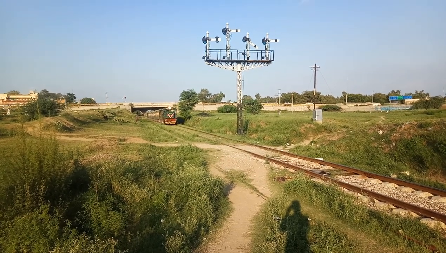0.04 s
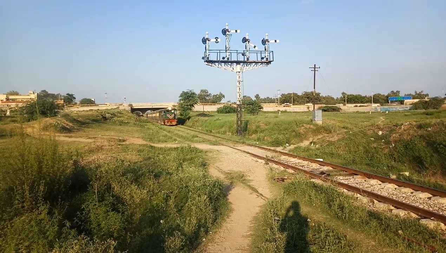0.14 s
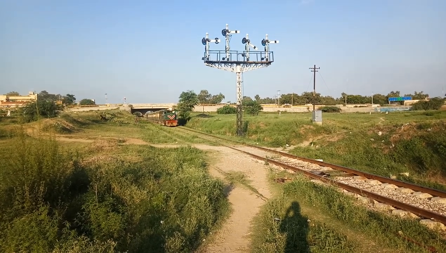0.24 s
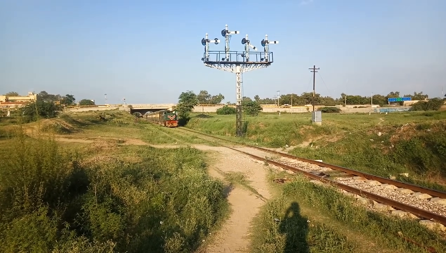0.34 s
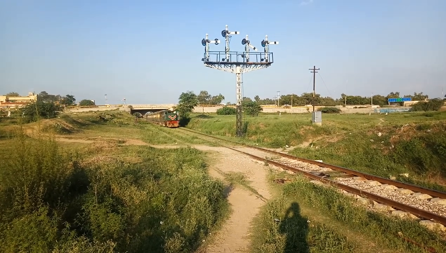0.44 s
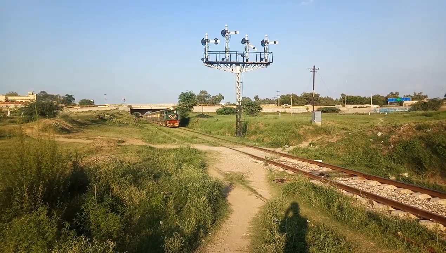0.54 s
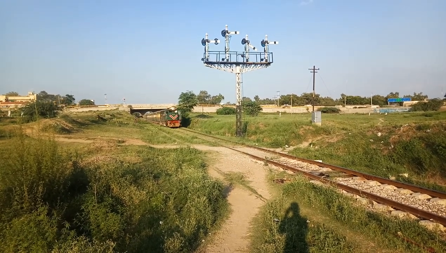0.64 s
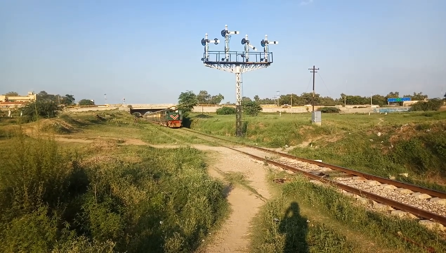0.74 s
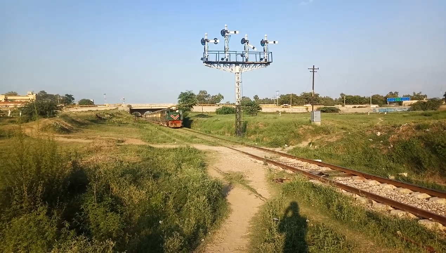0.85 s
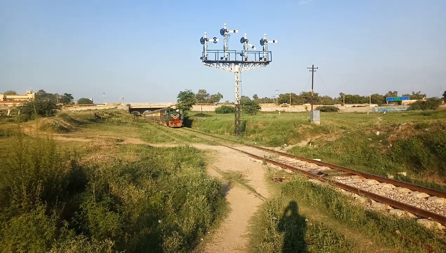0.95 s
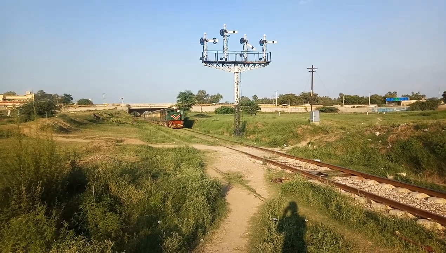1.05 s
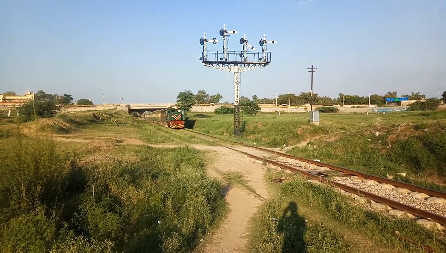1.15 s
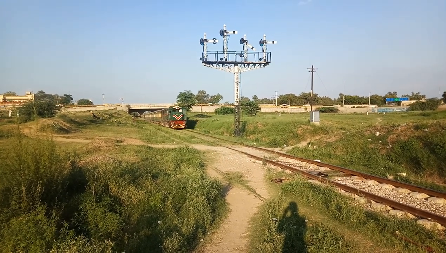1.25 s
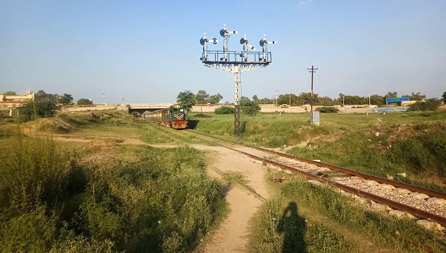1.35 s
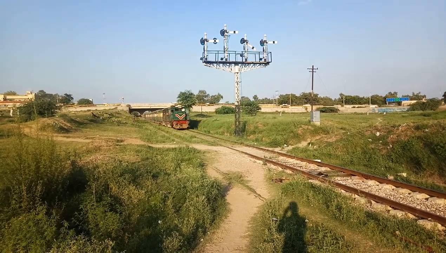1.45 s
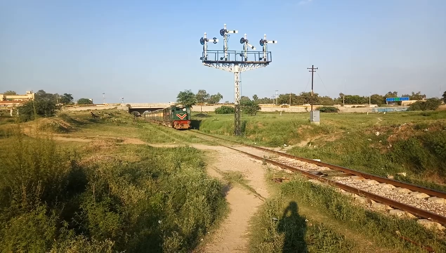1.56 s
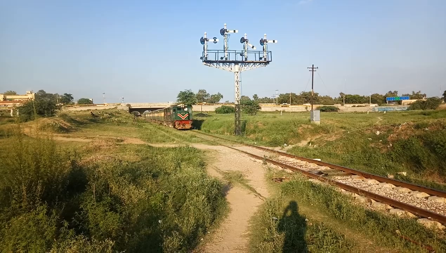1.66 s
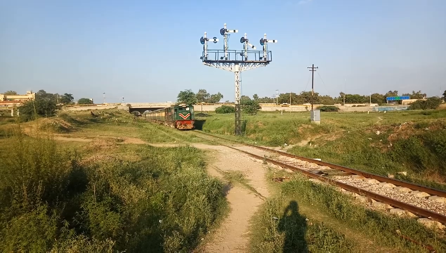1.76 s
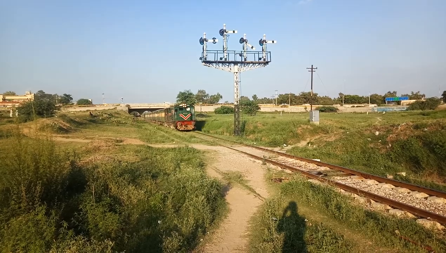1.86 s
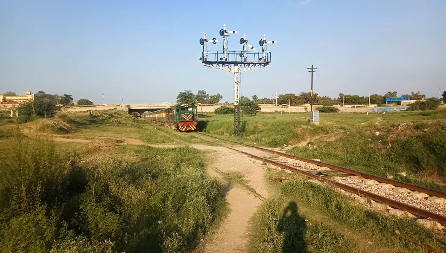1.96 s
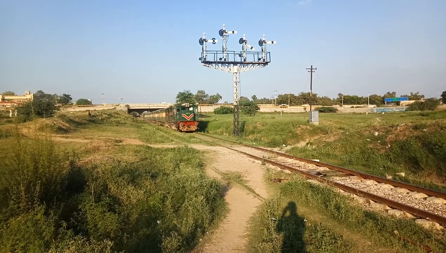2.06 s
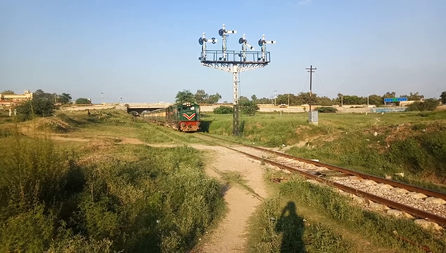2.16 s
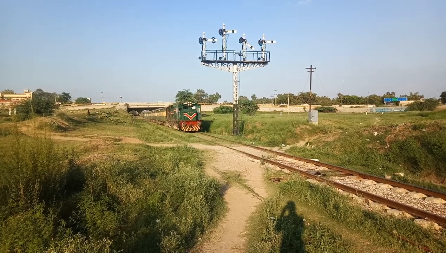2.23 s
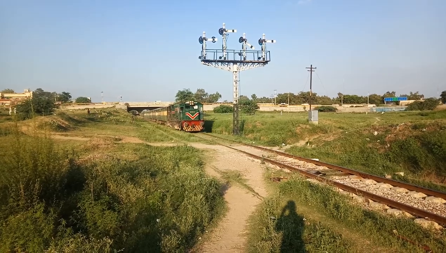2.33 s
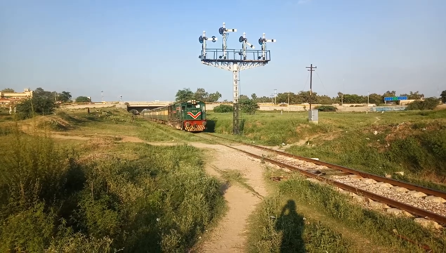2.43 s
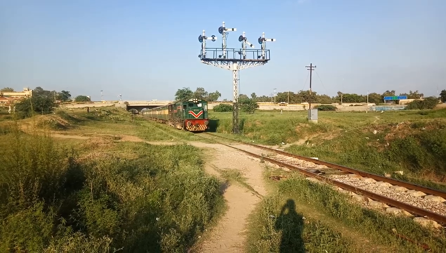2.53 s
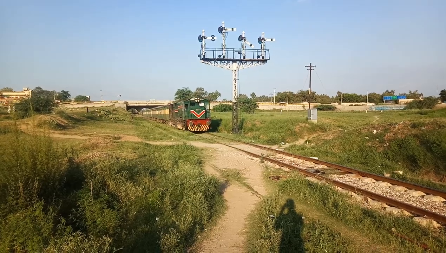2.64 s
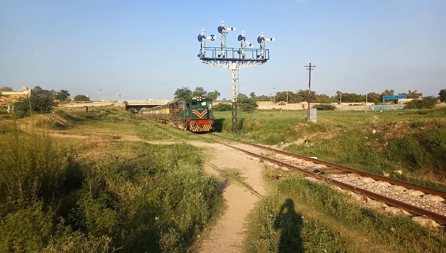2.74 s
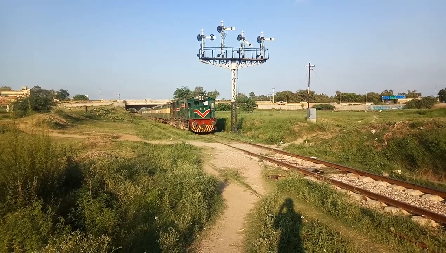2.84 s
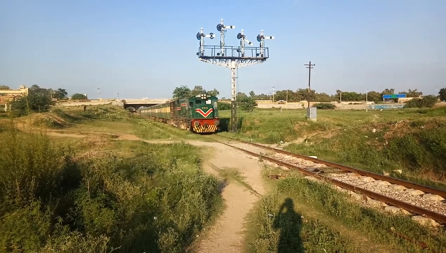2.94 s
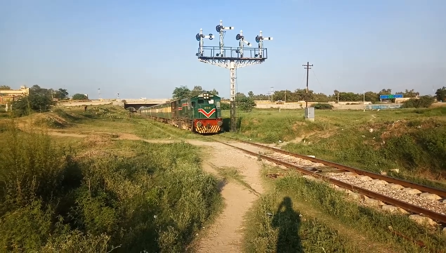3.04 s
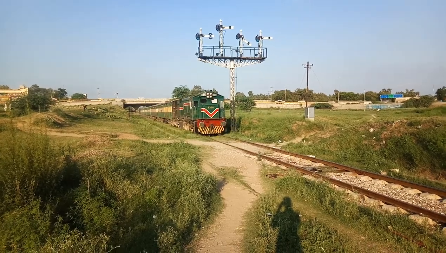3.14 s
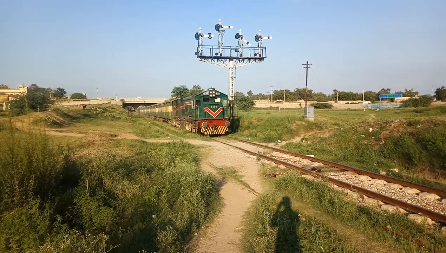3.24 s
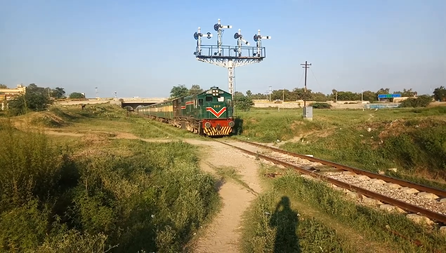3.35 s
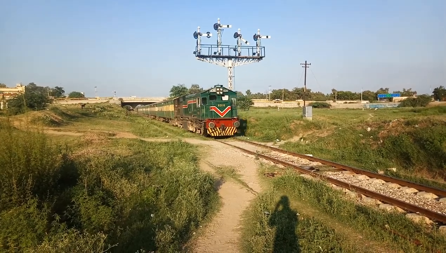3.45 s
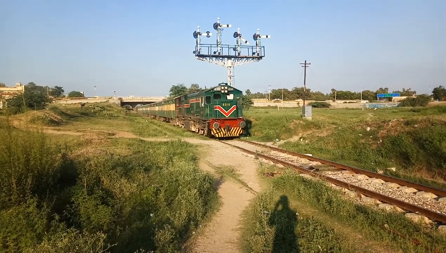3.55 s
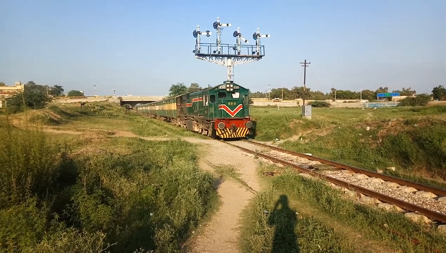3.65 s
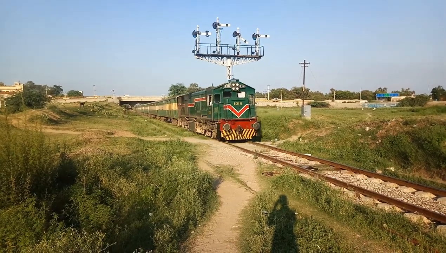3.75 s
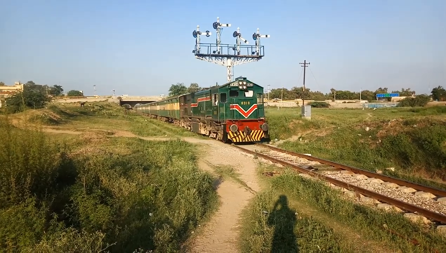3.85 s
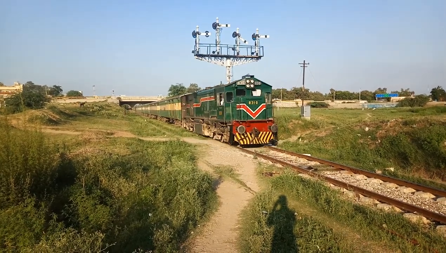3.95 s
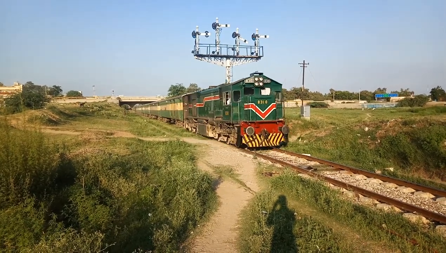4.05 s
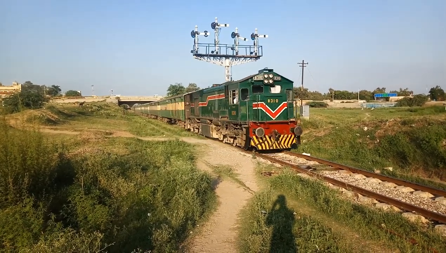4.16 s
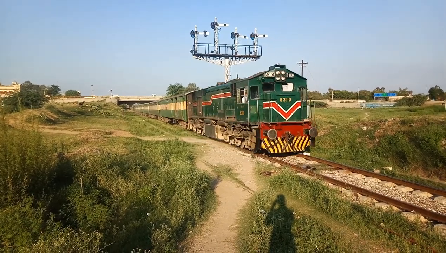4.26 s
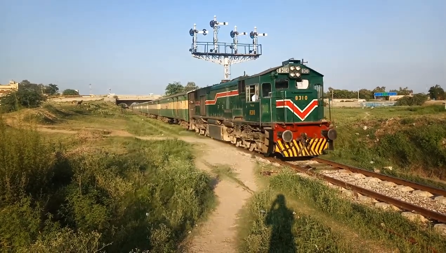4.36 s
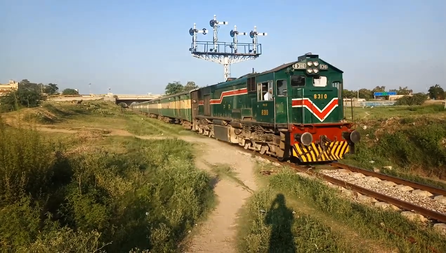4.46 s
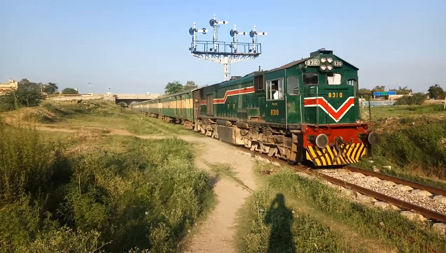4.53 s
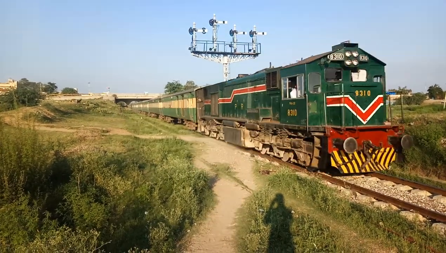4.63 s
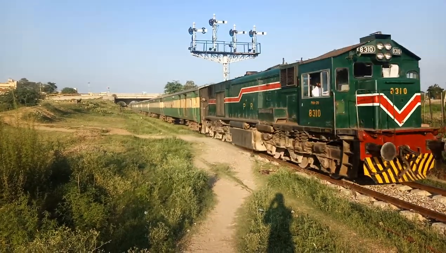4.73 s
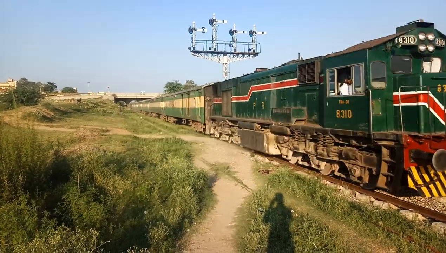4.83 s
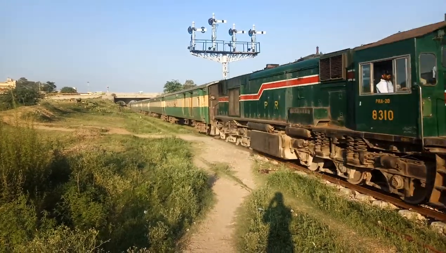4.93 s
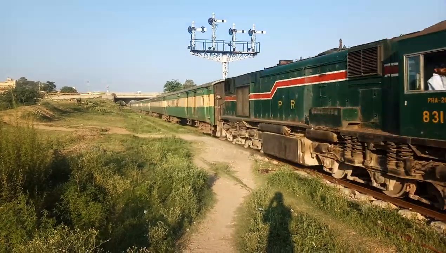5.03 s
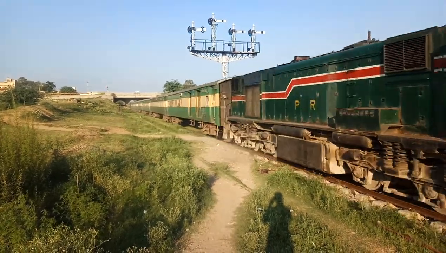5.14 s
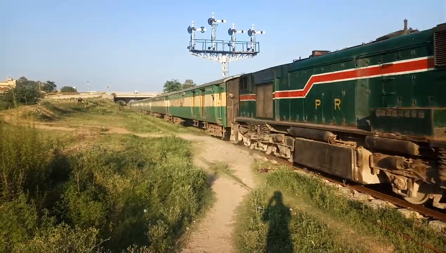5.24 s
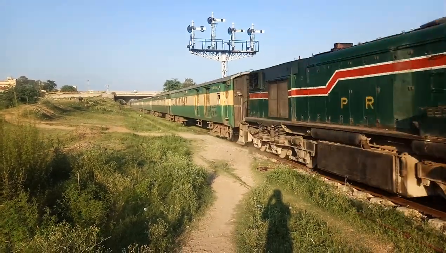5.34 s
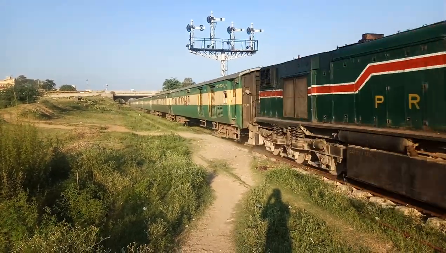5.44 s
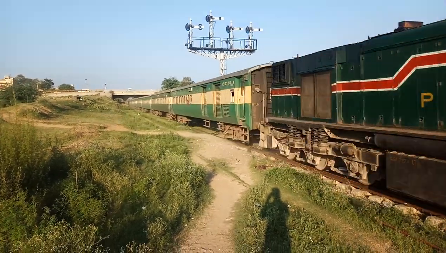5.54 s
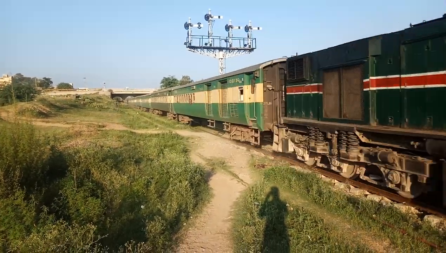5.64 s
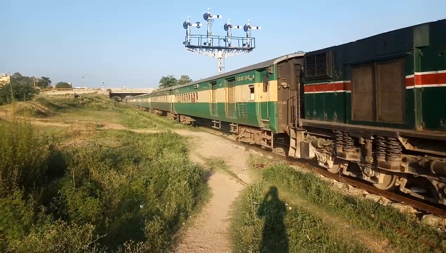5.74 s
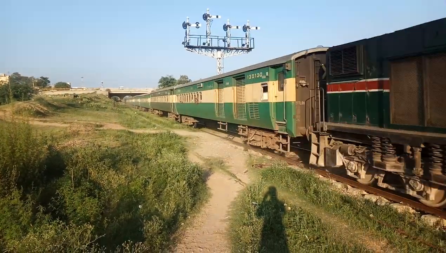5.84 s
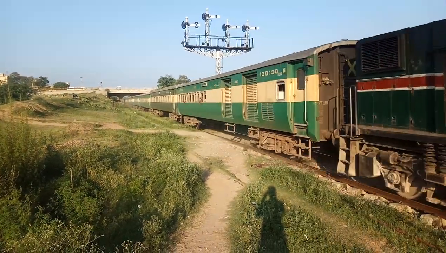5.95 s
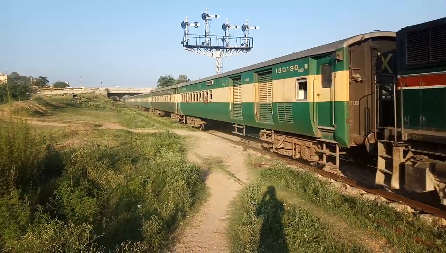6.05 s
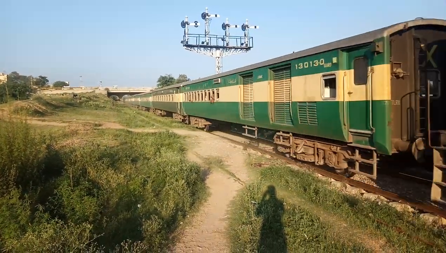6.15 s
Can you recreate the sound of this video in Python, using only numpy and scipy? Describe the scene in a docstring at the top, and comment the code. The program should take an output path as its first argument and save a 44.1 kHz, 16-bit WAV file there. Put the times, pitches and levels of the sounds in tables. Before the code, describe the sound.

Open field, dry and without echo, fixed microphone a few metres from a single track. From 0 s a distant diesel throbs softly, a low, slightly unsteady drone around a hundred pulses a second, over faint hiss and thin ringing in the rails. A tiny squeak opens it; dry ticks fall near 0.6 and 1.3 s. Weak joint clanks come at 0.25, 1.1, 2.0 and 2.8 s. The throb and singing rails grow steadily, with firmer knocks at 3.7 and 3.9 s. From 4.3 s axles hit the joint about every 0.14 s: sharp crack, bright clank, short thud. The cab draws level at 5 s, engine and rails at their fullest. Thuds become heavier and closer together until 5.7 s as bogie roar, rattling gear, tread hiss and ringing wheel discs take over. A last double blow lands just after 6 s, still loud at the 6.2 s cut.

```python
"""A diesel passenger train comes up a single track in open fields and passes a few metres away.
Noise puffs and wavering tones make the exhaust throb and drone; filtered noise sings in the rails.
Axle after axle strikes a rail joint: noise bursts crack, clank and thud.
As the locomotive draws level, the broad noise roar of its bogies takes over, with ringing wheel discs.
Ground rumble, faint hiss, thin squeaks and two dry ticks fill in the rest."""
import sys
import numpy as np
from scipy import signal
from scipy.fft import rfft, irfft, next_fast_len
from scipy.io import wavfile
from scipy.ndimage import uniform_filter1d, minimum_filter1d, map_coordinates

SR = 44100
rng = np.random.default_rng(int(sys.argv[2]) if len(sys.argv) > 2 else 0)


def generate_wav(signal):
    """Clip the signal to [-1, 1] and save it as 16-bit WAV at the path in sys.argv[1]."""
    frames = np.transpose(np.atleast_2d(signal))
    scaled = np.clip(frames, -1, 1) * 32767
    pcm = np.round(scaled).astype(np.int16)
    wavfile.write(sys.argv[1], SR, pcm)


N = 272979

# Engine speed as heard. Each row: time in seconds, firings per second.
FIRING_RATE = [(0, 105), (3.5, 103.8), (4.5, 105.6), (5.4, 104), (6.19, 108.5)]
# Strong engine lines. Each row: multiple of the firing rate, relative level in dB, width in Hz.
ENGINE_LINES = [(3, -2.7, 10), (34 / 12, -5.5, 13), (2, -9.5, 10), (22 / 12, -16.5, 8.8),
                (13 / 12, -15.5, 6.5)]
# Swell of the drone. Each row: time in seconds, relative level in dB.
DRONE_SWELL = [(0.0, -47), (0.5, -43.0), (0.8, -43.5), (0.97, -47), (1.3, -40), (1.9, -37), (2.75, -37),
               (3.12, -28.5), (3.45, -30.7), (3.93, -18.5), (4.4, -19.5), (4.82, -25), (5.0, -20.3),
               (5.3, -26.7), (5.5, -16.5), (5.8, -24.5), (6.19, -18)]
# Exhaust close by. Each row: frequency in Hz, relative power density in dB.
EXHAUST_NEAR_SPECTRUM = [(15, -34.5), (35, -29), (50, -27.5), (72, -9), (98, -8), (120, -2.5), (165, -3),
                         (205, 1.5), (255, -1.5), (320, -2.5), (400, -5.5), (470, -15.5), (900, -63),
                         (3000, -110)]
# Exhaust from afar, the ground cancelling its middle. Each row: frequency in Hz, relative density in dB.
EXHAUST_FAR_SPECTRUM = [(15, -27.5), (40, -24.5), (75, -1.5), (105, -5.5), (150, 2.5), (210, -2.5),
                        (260, -0.5), (320, -3), (345, -9), (400, -9), (470, -22), (900, -61), (3000, -110)]
# Engine clatter. Each row: frequency in Hz, relative power density in dB.
CLATTER_SPECTRUM = [(250, -32), (480, -9.5), (630, 6), (740, 5), (920, 2.5), (1030, -20.5), (1180, -12.5),
                    (1500, -25.5), (2500, -25.5), (8000, -100)]
# Rail sound beneath its resonances. Each row: frequency in Hz, relative power density in dB.
RAIL_SPECTRUM = [(300, -52.5), (600, -6.5), (1400, -7), (1650, -11.5), (2300, -19.5), (2650, -3.5),
                 (3800, -1), (4300, -8.5), (5000, -22), (6000, -31), (6900, -35.5), (7600, -48.5),
                 (10000, -52.5), (15500, -74)]
# Rail resonances. Each row: frequency in Hz, width in Hz, relative level in dB.
RAIL_RESONANCES = [(1177, 116, -2.5), (1896, 204, -3), (2600, 256, -1.5), (3480, 500, -2), (3520, 130, -11)]
# Pitch of the ringing rails. Each row: time in seconds, frequency ratio.
RAIL_PITCH_RATIO = [(0, 1.038), (2.3, 1.039), (3.4, 1.016), (4.6, .98), (6.19, .96)]
# Band that travels farthest along the rail. Each row: frequency in Hz, width in Hz, relative level in dB.
CARRIED_BAND = [(3540, 500, -0.5)]
# Bogies going by. Each row: time when level in seconds, relative level in dB.
BOGIES_LEVEL = [(5.54, 0), (6.17, 1.7)]
# Brake gear and bogie frames. Each row: frequency in Hz, relative power density in dB.
RATTLE_SPECTRUM = [(300, -24), (700, 2.5), (1200, 2), (1600, 2), (2000, 1), (2500, -0.5), (3700, -16.5),
                   (4800, -17.5), (7000, -35.5), (9000, -42), (15500, -52)]
# Bogie roar. Each row: frequency in Hz, relative power density in dB.
ROAR_SPECTRUM = [(60, -37.5), (150, -9.5), (280, 1), (400, 2), (550, 0.5), (750, -14.5), (1200, -13),
                 (3000, -56), (8000, -100)]
# Tread hiss. Each row: frequency in Hz, relative power density in dB.
HISS_SPECTRUM = [(3000, -15), (4900, -20), (5500, -26), (5950, 11.5), (6700, 0.5), (7600, -11), (9000, -16),
                 (9900, -25), (12000, -20), (15500, -20.5)]
# Ringing wheel discs. Each row: frequency in Hz, relative level in dB, width in Hz.
DISC_MODES = [(2630, 14, 89), (5270, 2.5, 110), (6130, -3, 320), (9030, -25, 110), (10300, -29, 90),
              (11300, -28, 90), (13300, -31, 90), (14300, -32.5, 120)]
# Ground rumble. Each row: frequency in Hz, relative power density in dB.
RUMBLE_SPECTRUM = [(15, -30), (35, -26), (52, -1), (75, 11.5), (130, 15.5), (180, -9.5), (350, -48),
                   (1500, -110)]
# Thin squeaks. Each row: start in seconds, frequency in Hz, level in dB, length in seconds.
SQUEAK_EVENTS = [(0.015, 2060, -48.5, 0.05), (5.178, 9030, -49, .035), (5.753, 13300, -59, 0.068)]
# Wheels on rail joints. Each row: time in seconds, relative clank dB, relative thud dB, thud in Hz.
JOINT_BLOWS = [(0.2496, -26.5, -39, 690), (1.1029, -27, -28.5, 1280), (1.9729, -17, -31, 1220),
               (2.8476, -18, -39, 450), (3.7494, -13, -9, 700), (3.8918, -15, -8.5, 810),
               (4.291, -2.5, -9.5, 650), (4.4292, -4, -6.5, 700), (4.582, -3, -10.5, 670),
               (4.7062, -2.5, -11, 850), (4.8489, 0.5, -18, 750), (5.002, -2.5, -12, 645),
               (5.1377, -6, -22, 750), (5.2621, -5, -18, 830), (5.3219, -10, -3, 500),
               (5.4042, -9, -8.5, 780), (5.4654, -6.5, -7.5, 590), (5.6201, -7, -4, 450),
               (5.7025, -10.5, -14, 660), (6.029, -6, -2, 533), (6.0659, -6.5, -7, 690)]
# First sharp contact of steel on steel. Each row: frequency in Hz, relative power density in dB.
CRACK_SPECTRUM = [(600, -8), (2000, 5), (4000, 0), (5000, -4.5), (6500, -9.5), (8000, -25.5),
                  (10000, -37.5), (15500, -42)]
# Rail clank. Each row: frequency in Hz, relative power density in dB.
CLANK_SPECTRUM = [(300, -17), (900, -2), (2200, -12.5), (2750, 0.5), (3800, 0.5), (4400, -7), (5300, -20),
                  (6200, -21.5), (7600, -42), (10000, -51), (15500, -47.5)]
# Sleeper and bogie thud. Each row: frequency in Hz, relative power density in dB.
THUD_SPECTRUM = [(50, -20), (150, -2.5), (330, 4.5), (520, -2.5), (850, -5.5), (1400, -8.5), (3000, -26.5),
                 (10000, -91)]
# Dry ticks. Each row: start in seconds, level in dB.
TICK_EVENTS = [(.642, -44), (1.280, -44)]

# Train speed, distance of the track, moment the cab draws level.
SPEED_M_PER_S, TRACK_M, LEVEL_S = 14.6, 4.78, 5.023
# Approach: full level, distance where reached, spreading dB per tenfold distance,
# ground that halves the amplitude, fade in dB per second behind the cab.
EXHAUST_PASS = dict(full_db=-18, reach_m=11.2, spread_db=6.5, halving_m=27.6, fade_db=4.5)
CLATTER_PASS = dict(full_db=-24, reach_m=15.4, spread_db=27, halving_m=56, fade_db=4.5)
RAIL_PASS = dict(full_db=-19.5, reach_m=10, spread_db=18.5, halving_m=58, fade_db=5)
CARRIED_PASS = dict(full_db=-38, reach_m=12, spread_db=2, halving_m=24.3, fade_db=4)
WHEEL_PASS = dict(full_db=-44.5, reach_m=5.7, spread_db=16, halving_m=3.9, fade_db=6)
RUMBLE_PASS = dict(full_db=-35.5, reach_m=15, spread_db=6, halving_m=300, fade_db=1)
AIR_PASS = dict(full_db=-72.5, reach_m=15, spread_db=1.5, halving_m=125, fade_db=1)

FAR_COLOUR_M = 33.7  # metres still to run beyond which the exhaust is all far colour
GRASS_HALVING_M = 17  # grass muffles the low-slung running gear
CRACK_DB, CRACK_HALVING_M = -18, 13  # crack relative to the whole blow; ground swallows it
DULL_HZ, DULL_HALVING_M = 14000, 15  # a distant clank loses its top: this stretch halves this frequency
CRACK_T60_S, CLANK_T60_S, THUD_T60_S = .066, .11, .16
TOP_HZ = 15600


def amp(db):
    """Decibels to amplitude gain."""
    return 10 ** (np.asarray(db) / 20)


def unit(x):
    """Scale to rms 1."""
    return x / np.sqrt(np.mean(x ** 2) + 1e-20)


def seconds(count=N):
    """Time of each sample."""
    return np.arange(count) / SR


def curve(rows):
    """Interpolate (time, value) rows to one value per sample."""
    s, values = np.transpose(rows)
    return np.interp(seconds(), s, values)


def wobble(rate):
    """Smooth random curve of rms 1, rate knots per second."""
    knots = rng.standard_normal(4096)
    coarse = np.arange(0, N + 32, 32)
    values = map_coordinates(knots, [coarse * rate / SR], mode="mirror")
    return unit(np.interp(np.arange(N), coarse, values))


def wavering(width_hz):
    """Complex gain drifting in strength and phase, widening a tone into a narrow band."""
    return (wobble(2 * width_hz) + 1j * wobble(2 * width_hz)) / np.sqrt(2)


def colour(x, spectrum, modes=()):
    """Minimum-phase filter with a given spectrum plus resonances; rms 1 out."""
    size = 2 * next_fast_len(len(x) // 2 + 1024)
    hz = np.fft.rfftfreq(size, 1 / SR)
    f, db = np.transpose(spectrum)
    power = amp(np.interp(np.log(hz + 1), np.log(f), db)) ** 2
    for centre, width, level in modes:
        power = power + amp(level) ** 2 / (1 + ((hz - centre) / width) ** 2) ** 3
    # fold the cepstrum onto positive time to make the filter causal
    cepstrum = irfft(np.log(power + 1e-14) / 2)
    cepstrum[1:size // 2] *= 2
    cepstrum[size // 2 + 1:] = 0
    response = np.exp(rfft(cepstrum))
    return unit(irfft(rfft(x, size) * response, size)[:len(x)])


def noise(count=N):
    """White noise of rms 1."""
    return rng.standard_normal(count)


def add(track, s, sound):
    """Mix a sound into the track at time s."""
    room = track[max(round(s * SR), 0):][:len(sound)]
    room += sound[:len(room)]


def ahead(reach_m):
    """Metres the train has still to run until within reach_m of level."""
    return np.maximum(SPEED_M_PER_S * (LEVEL_S - seconds()) - reach_m, 0)


def halved(gap_m, halving_m):
    """Loss in dB when every halving_m metres halve the amplitude."""
    return 20 * np.log10(2) * gap_m / halving_m


def passing(full_db, reach_m, spread_db, halving_m, fade_db):
    """Level in dB: grows by spreading and ground loss, holds, fades once the cab is past."""
    gap = ahead(reach_m)
    past_s = np.maximum(seconds() - LEVEL_S, 0)
    spreading = spread_db * np.log10(np.hypot(1, gap / TRACK_M))
    return full_db - spreading - halved(gap, halving_m) - fade_db * past_s


def puffs(firings, uneven_db, scatter_db, fade, count=12):
    """One decaying gas puff per firing; each cylinder has its own strength."""
    index = firings.astype(int)
    cylinders = uneven_db * unit(noise(count))
    strength = amp(cylinders[index % count] + scatter_db * noise(2048)[index])
    return unit(strength * np.exp(-fade * (firings % 1)))


def exhaust(firings):
    """Turbulent gas puffs whose colour turns from far to near."""
    gas = puffs(firings, uneven_db=1.5, scatter_db=0.9, fade=0.74)
    turn = np.pi / 2 * np.clip(1 - ahead(reach_m=12.7) / FAR_COLOUR_M, 0, 1)
    far = np.cos(turn) * colour(gas * noise(), EXHAUST_FAR_SPECTRUM)
    near = np.sin(turn) * colour(gas * noise(), EXHAUST_NEAR_SPECTRUM)
    flutter_db = 0.91 * wobble(12) + 0.8 * wobble(5.015)
    return amp(passing(**EXHAUST_PASS) + flutter_db) * (far + near)


def drone(firings):
    """Strongest engine orders, wandering on their way through hot, moving air."""
    lines = np.zeros(N)
    for order, db, width_hz in ENGINE_LINES:
        wander = 0.96 + 0.69 * wavering(width_hz)
        lines += amp(db) * np.real(wander * np.exp(2j * np.pi * order * firings))
    return amp(curve(DRONE_SWELL) + 1.76) * lines


def clatter(firings):
    """Mechanical knocks: noise pulsing in step with the firing."""
    knocks = puffs(firings, uneven_db=1.25, scatter_db=1.06, fade=.6)
    return amp(passing(**CLATTER_PASS)) * colour(knocks * noise(), CLATTER_SPECTRUM)


def engine():
    """Exhaust, drone and clatter share one slightly unsteady firing count."""
    firings = np.cumsum(curve(FIRING_RATE) * (1 + .003 * wobble(6))) / SR
    return exhaust(firings) + drone(firings) + clatter(firings)


def rolling(grit_db, grit_rate, judder_db, judder_rate):
    """Contact force of rough steel: noise in quick grains and slower judders."""
    return noise() * amp(grit_db * wobble(grit_rate) + judder_db * wobble(judder_rate))


def chatter(rate, t60_s, share):
    """Gain of loose parts knocking at random, rate per second; share is the knocks' part of the power."""
    struck = rng.random(N) < rate / SR
    size = rng.exponential(size=N)
    decay = amp(-60 * seconds(SR // 10) / t60_s) ** 2
    power = np.abs(signal.fftconvolve(struck * size, decay)[:N])
    return np.sqrt(1 - share + share * power / power.mean())


def patchy(x, depth_db):
    """Give each band its own slow swells as the radiating parts move."""
    z = signal.stft(x, nperseg=512)[2]
    field = uniform_filter1d(noise(z.shape), size=5, axis=0)
    field = uniform_filter1d(field, size=14, axis=1)
    return unit(signal.istft(z * amp(depth_db * unit(field)), nperseg=512)[1][:N])


def rails():
    """Rails carry the wheels' vibration far ahead and radiate it at their resonances."""
    force = rolling(grit_db=-0.05, grit_rate=350, judder_db=0.5, judder_rate=25)
    force = force * chatter(rate=92, t60_s=0.076, share=0.16)
    ring = patchy(colour(force, RAIL_SPECTRUM, RAIL_RESONANCES), depth_db=2)
    # variable-speed reading bends the pitch
    sliding = map_coordinates(ring, [np.cumsum(curve(RAIL_PITCH_RATIO))], mode="mirror")
    silent_bed = [(20, -120), (20000, -120)]
    carried = patchy(colour(noise(), silent_bed, CARRIED_BAND), depth_db=5)
    return amp(passing(**RAIL_PASS)) * sliding + amp(passing(**CARRIED_PASS)) * carried


def abreast(beam_m, steepness):
    """Gain of sound thrown sideways from each bogie, strongest as it goes by."""
    power = np.zeros(N)
    for s, db in BOGIES_LEVEL:
        offset_m = SPEED_M_PER_S * (seconds() - s)
        power += amp(db) ** 2 / (1 + (offset_m / beam_m) ** 2) ** steepness
    return np.sqrt(power) * amp(-halved(ahead(reach_m=9.1), GRASS_HALVING_M))


def shaken(t60_s, depth):
    """Gain of running gear that every joint thud shakes up and that then settles."""
    power, t = np.ones(N), seconds(SR)
    for s, _, thud_db, _ in JOINT_BLOWS:
        add(power, s, (depth * amp(thud_db - 60 * t / t60_s)) ** 2)
    return np.sqrt(power)


def wheel_discs():
    """Disc modes ring as narrow bands, each swelling at random."""
    discs = np.zeros(N)
    for hz, db, width_hz in DISC_MODES:
        tone = np.real(wavering(width_hz) * np.exp(2j * np.pi * hz * seconds()))
        discs += amp(db) * tone * amp(2.0 * wobble(8.3))
    return discs


def bogies():
    """Close by, the running gear roars and rattles, the treads hiss and the wheel discs ring."""
    force = rolling(grit_db=0.1, grit_rate=200, judder_db=0.5, judder_rate=35)
    force = force * chatter(rate=54, t60_s=0.088, share=0.27)
    rattle = patchy(colour(force, RATTLE_SPECTRUM), depth_db=2.0) * abreast(beam_m=9.3, steepness=1.49)
    roar = colour(noise(), ROAR_SPECTRUM) * abreast(beam_m=4.1, steepness=1.72)
    treads = rolling(grit_db=2.0, grit_rate=400, judder_db=1.5, judder_rate=15)
    hiss = patchy(colour(treads, HISS_SPECTRUM), depth_db=2.0)
    wheels = amp(passing(**WHEEL_PASS)) * (hiss + amp(-6.0) * wheel_discs())
    return shaken(t60_s=0.43, depth=2.85) * (amp(-25.0) * rattle + amp(-23.0) * roar + wheels)


def ground_rumble():
    """Low noise from the ground, growing as the train nears."""
    return amp(passing(**RUMBLE_PASS)) * colour(noise(), RUMBLE_SPECTRUM)


def air_hiss():
    """Faint white noise, rising slightly as the train nears."""
    return amp(passing(**AIR_PASS)) * noise()


def squeaks():
    """Short, slightly phase-wavering tones that swell and fade."""
    track = np.zeros(N)
    for s, hz, db, length_s in SQUEAK_EVENTS:
        t = seconds(int(length_s * SR))
        tone = np.sin(2 * np.pi * hz * t + 1.1 * wobble(200)[:len(t)])
        add(track, s, amp(db) * np.hanning(len(t)) * tone)
    return track


def dulled(spectrum, gap_m):
    """Spectrum heard from gap_m away: loss in dB climbs with frequency cubed."""
    hz, db = np.transpose(spectrum)
    return np.column_stack([hz, db - halved(gap_m, DULL_HALVING_M) * (hz / DULL_HZ) ** 3])


def burst(t, t60_s, spectrum, modes=(), rise_s=None):
    """Coloured noise with exponential decay and, if rise_s is given, a soft onset."""
    sound = colour(noise(len(t)), spectrum, modes) * amp(-60 * t / t60_s)
    return sound if rise_s is None else sound * (1 - np.exp(-t / rise_s))


def joints():
    """Each wheel drops on a rail end: instant crack, rail clank, slower-rising sleeper and bogie thud."""
    track, t = np.zeros(N), seconds(SR // 3)
    gaps = ahead(reach_m=0)
    for s, clank_db, thud_db, thud_hz in JOINT_BLOWS:
        gap_m = gaps[round(s * SR)]
        blow = np.hypot(amp(clank_db), amp(thud_db))
        crack_gain = blow * amp(CRACK_DB - halved(gap_m, CRACK_HALVING_M))
        crack = burst(t, CRACK_T60_S, CRACK_SPECTRUM)
        clank = burst(t, CLANK_T60_S, dulled(CLANK_SPECTRUM, gap_m), RAIL_RESONANCES, rise_s=0.0024)
        thud = burst(t, THUD_T60_S, THUD_SPECTRUM, [(thud_hz, 420, 3)], rise_s=0.0072)
        hit = crack_gain * crack + amp(clank_db - 7.5) * clank + amp(thud_db - 3.5) * thud
        add(track, s + .002, hit)
    return track


def ticks():
    """Thin, high sine ticks that die within milliseconds."""
    track, t = np.zeros(N), seconds(SR // 50)
    for s, db in TICK_EVENTS:
        ring = np.sin(2 * np.pi * 6950 * t) * (1 - np.exp(-t / .0005)) * amp(-60 * t / .008)
        add(track, s, amp(db) * ring)
    return track


def scene():
    """Sum of all sources, 3 dB softer for the first moment."""
    train = engine() + rails() + bogies() + ground_rumble() + air_hiss()
    events = squeaks() + joints() + ticks()
    opening = amp(curve([(.15, -3), (.27, 0)]))  # seconds, dB
    return (opening * (train + events))[None]


def record(dry):
    """Duck the highest peaks briefly, fade the last 150 samples, low-pass at TOP_HZ."""
    needed = np.minimum(1, .9 / (np.abs(dry) + 1e-9))
    gain = uniform_filter1d(minimum_filter1d(needed, size=200), size=180)
    stop = np.minimum(1, np.arange(N)[::-1] / 150)
    low_pass = signal.ellip(12, .1, 90, TOP_HZ, fs=SR, output="sos")
    return signal.sosfilt(low_pass, dry * gain * stop)


dry = scene()
out = record(dry)
generate_wav(out)
```